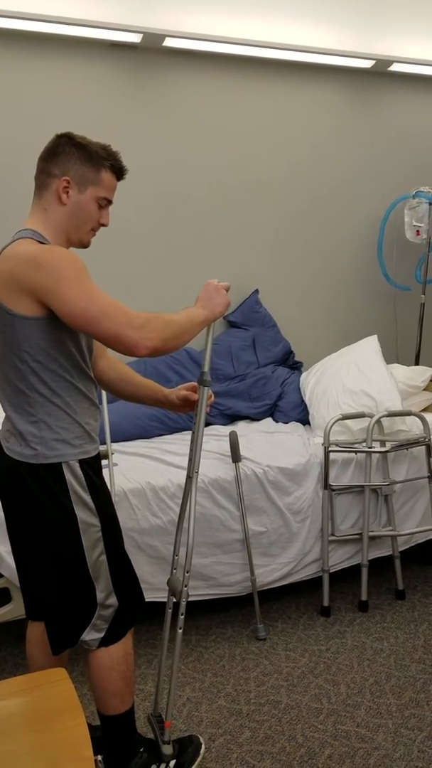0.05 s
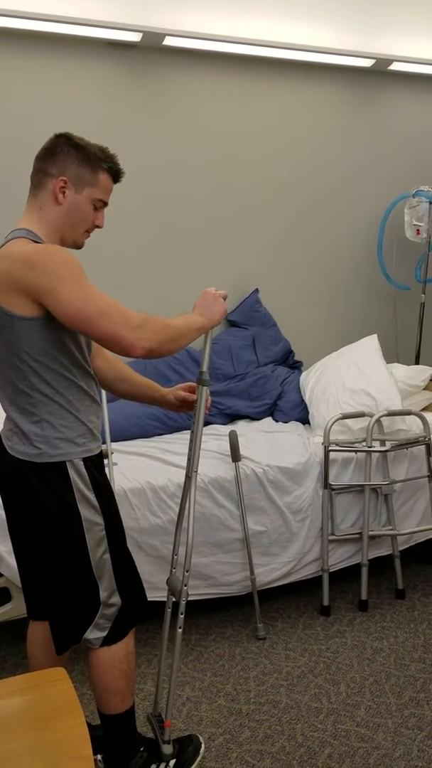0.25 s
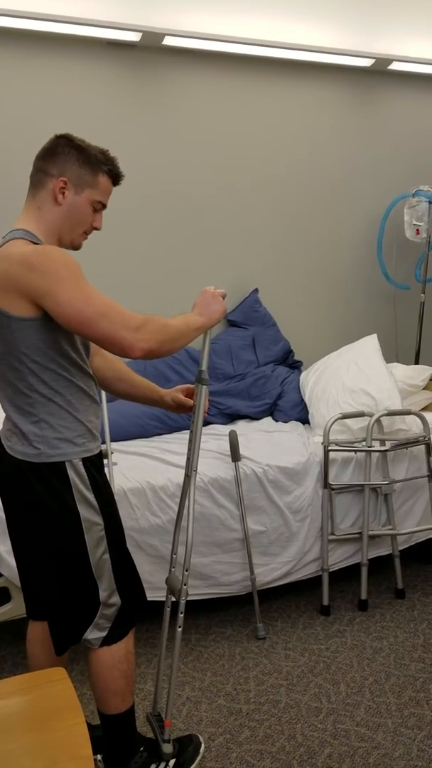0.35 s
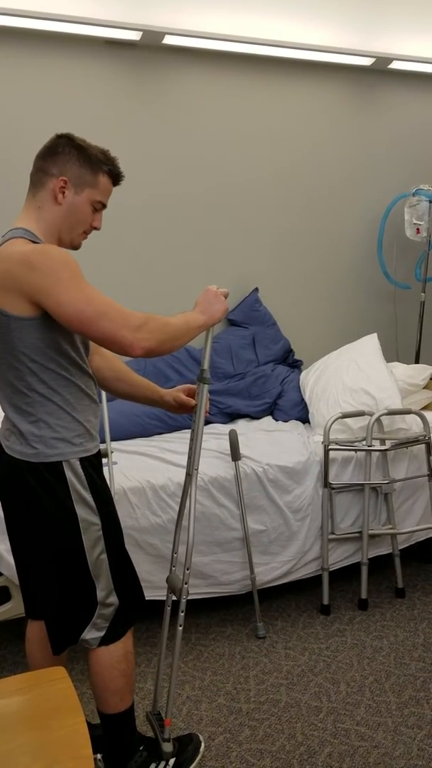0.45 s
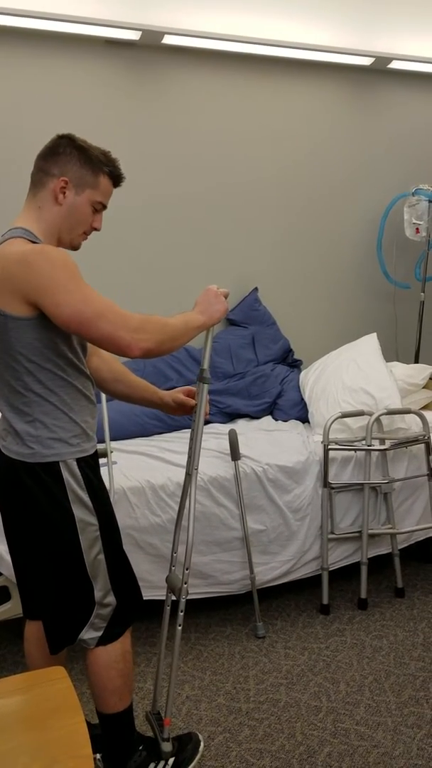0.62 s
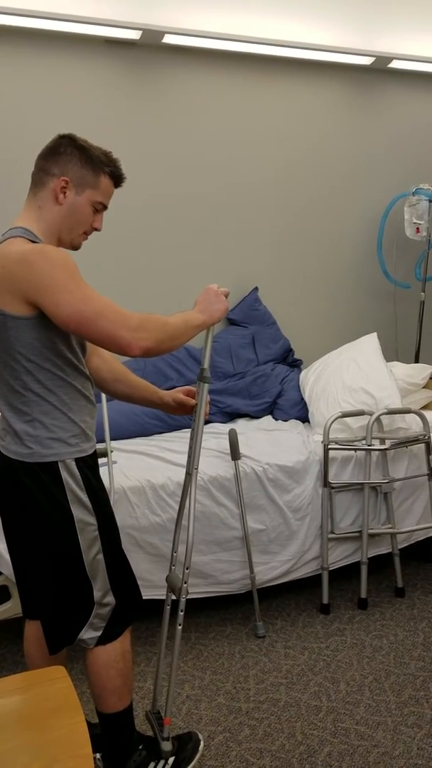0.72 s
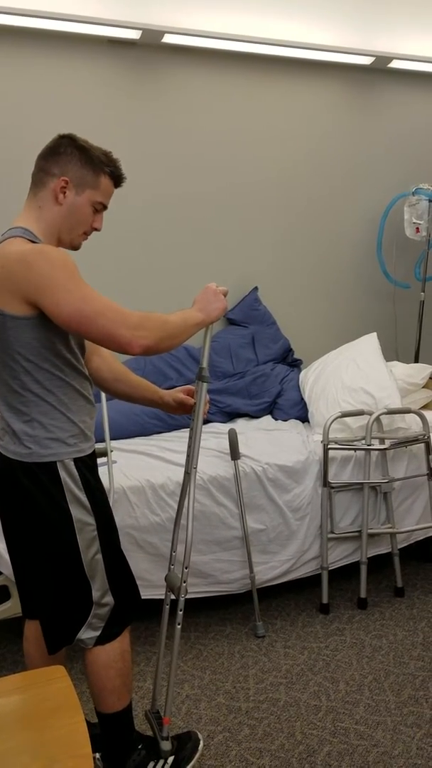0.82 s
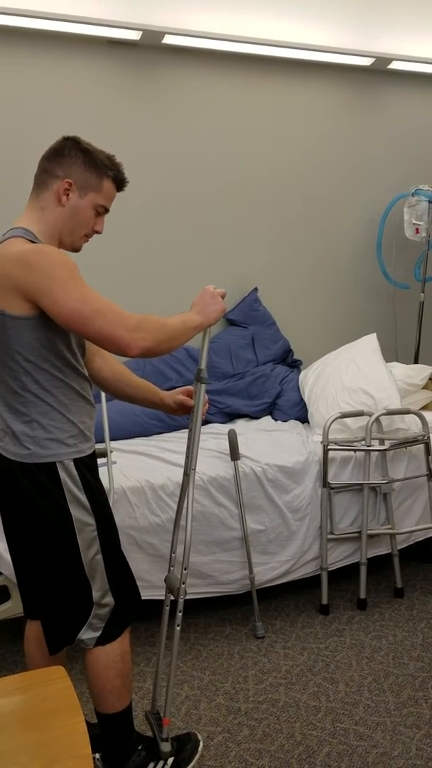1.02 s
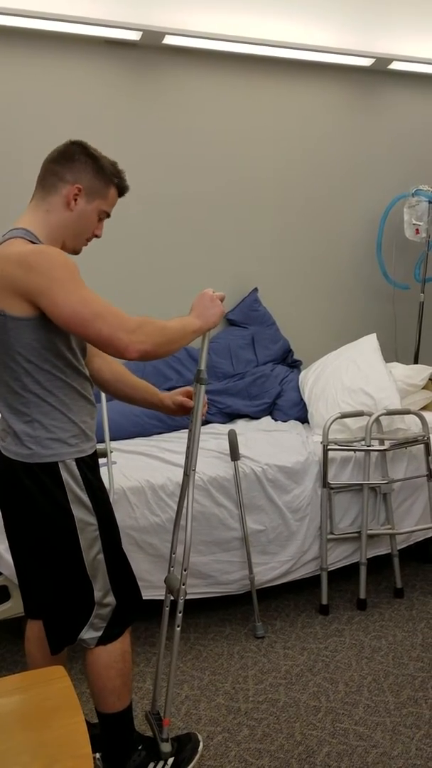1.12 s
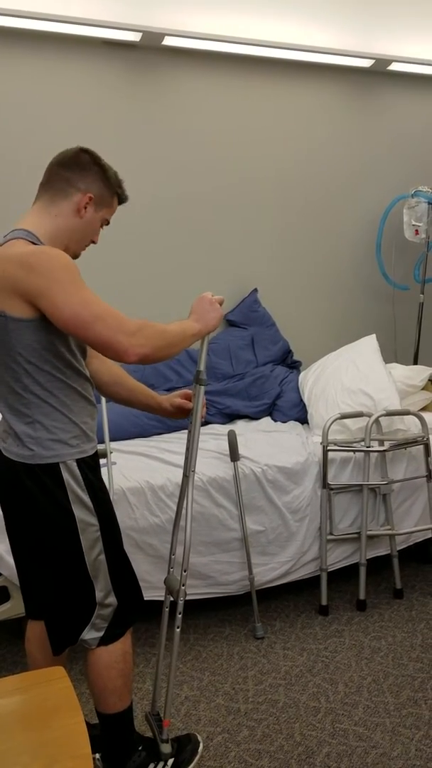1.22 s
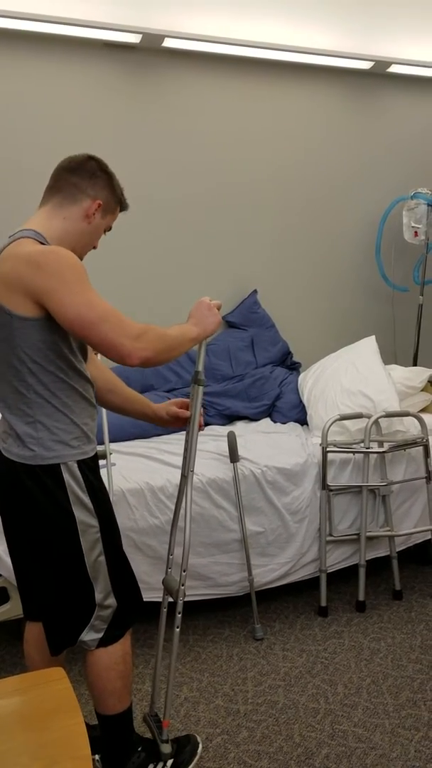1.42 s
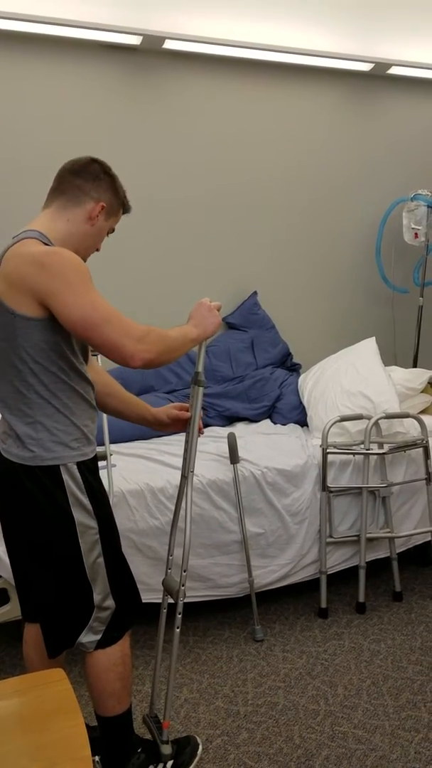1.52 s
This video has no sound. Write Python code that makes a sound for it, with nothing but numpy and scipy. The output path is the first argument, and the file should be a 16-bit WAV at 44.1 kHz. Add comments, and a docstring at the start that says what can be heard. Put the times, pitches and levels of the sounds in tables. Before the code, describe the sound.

An aluminium crutch's spring pin snaps into a hole twice, a second apart, each clack ringing briefly. Between them the pin ticks lightly and the tube slides softly, a few steps away in a small room with faint ventilation hum.

```python
"""The spring pin of an aluminium crutch snaps twice into a hole, a few steps away in a small clinic room.
Each impact radiates a sharp crack and excites the tube's modes, which rattle and ring as they decay.
Between the clacks the pin ticks lightly, one tube slides in the other with soft friction noise,
and the hands add a dull rumble. The walls reflect clacks and ticks over the hum of the ventilation."""
import sys
import numpy as np
from scipy import signal
from scipy.fft import rfft, irfft
from scipy.io import wavfile

SR = 44100
rng = np.random.default_rng(int(sys.argv[2]) if len(sys.argv) > 2 else 0)


def unload_audio(sound):
    """Save the sound as a 16-bit wav file, at the path given as the first command line argument."""
    columns = np.transpose(np.atleast_2d(sound))
    # keep every value between -1 and 1, then stretch to whole-number steps
    steps = np.round(np.clip(columns, -1, 1) * 32767)
    wavfile.write(sys.argv[1], SR, steps.astype(np.int16))


N = 68355

# level difference between the ears for sound from the crutch: f/Hz, left minus right/dB
BALANCE = [(250, -0.5), (700, -0.5), (1300, -7.5), (2400, -3.5), (4400, -0.5), (8000, 1), (15000, -1)]
# coherence of the sound field at the two ears: f/Hz, correlation coefficient
COHERENCE = [(60, .95), (300, 0.93), (780, 0.77), (1300, .15), (2400, -.1), (5000, 0), (15000, 0)]
ROOM_DELAY_S = 0.0074


def amp(db):
    """Amplitude ratio of a level: 20 dB is a factor of ten."""
    return 10 ** (np.asarray(db) / 20)


def unit(x):
    """Normalisation to an rms of 1."""
    return x / np.sqrt(np.mean(x ** 2) + 1e-20)


def read(points, hz):
    """Interpolation of a curve on a logarithmic frequency axis."""
    f, value = np.transpose(points)
    return np.interp(np.log(hz + 1), np.log(f + 1), value)


def pan(db):
    """Left and right gains for an interaural level difference."""
    return amp(np.array([np.atleast_1d(db), -np.atleast_1d(db)]) / 2)


def since(start):
    """Elapsed time in seconds, zero before the onset."""
    return np.maximum(np.arange(N) / SR - start, 0)


def burst(start, hold, fall):
    """Transient envelope: a step, a plateau and exponential relaxation."""
    return (since(start) > 0) * np.exp(-since(start + hold) / fall)


def decay(t, t60):
    """Exponential damping by 60 dB in t60 seconds."""
    return np.exp(-np.log(1000) * t / t60)


def noise(colour, grain_db=0, lean=1):
    """Partially coherent noise, alike at both ears in the bass; lean = 1 gives the crutch's balance."""
    hz = np.fft.rfftfreq(N, 1 / SR)
    left, independent = rfft(rng.standard_normal((2, N)) * amp(grain_db * rng.standard_normal(N)))
    coherence = np.clip(read(COHERENCE, hz), -1, 1)
    right = coherence * left + np.sqrt(1 - coherence ** 2) * independent
    spectrum = np.array([left, right]) * pan(lean * read(BALANCE, hz))
    return unit(irfft(spectrum * amp(read(colour, hz)), N))


def ventilation():
    """Stationary background: a continuous spectrum of rumble and hiss plus the discrete lines of a hum."""
    # air noise: f/Hz, relative spectral density/dB
    air_colour = [(20, -12), (52, -2), (85, -8), (125, -7.5), (165, -15.5), (240, -11.5), (350, -22.5),
                  (460, -18), (600, -27.5), (820, -22), (1000, -30), (1350, -22), (2400, -28.5),
                  (3200, -29.5), (4400, -36.5), (9000, -41.5), (15500, -35.5)]
    # steady tones: f/Hz, level/dB
    hum = [(52, -73), (119, -71), (1363, -80)]
    t = since(0)
    tones = sum(amp(db) * np.sqrt(2) * np.sin(2 * np.pi * (hz * t + rng.random())) for hz, db in hum)
    return pan(-1.7) * (amp(-64) * noise(air_colour, lean=0.27) + tones)


def handling():
    """Structure-borne noise: hands shift the crutch and faintly stir its low resonance."""
    # movements of the hands: t/s, duration/s, level/dB
    shifts = [(0, .17, -57), (0.942, 0.31, -60)]
    # dull rumble: f/Hz, relative level/dB
    rumble_colour = [(20, -5), (60, -4), (118, 5.5), (170, -8), (253, 0), (310, -14.5), (600, -27.5),
                     (4000, -53.5)]
    envelope = sum(amp(db) * burst(start, length, fall=0.017) for start, length, db in shifts)
    return envelope * noise(rumble_colour, lean=0)


def slides():
    """Sliding friction: one tube rubs inside the other, and the noise dies as it comes to rest."""
    # strokes: t/s, rise time/s, T60/s, level/dB, bass shelf gain/dB
    strokes = [(0, .01, 0.7, -64, -11), (.025, 0.03, .42, -60.5, -13.5), (.11, 0.06, .4, -64, -12),
               (.63, .09, 0.23, -74.5, -12), (.956, 0.034, 0.92, -53, -0.5),
               (1.16, .035, 0.86, -61.5, -12.5)]
    # friction noise: f/Hz, relative level/dB
    rub_colour = [(100, 6.5), (450, 5), (800, 1), (1400, -0.5), (2200, -3.5), (4000, -15.5), (8500, -21.5),
                  (12500, -16), (15500, -15.5)]
    shelf_hz = 900
    bass = 1 / (1 + (np.fft.rfftfreq(N, 1 / SR) / shelf_hz) ** 4)
    out = np.zeros((2, N))
    for start, rise, t60, db, bass_db in strokes:
        rub = noise(rub_colour, grain_db=-1.5, lean=0.58)
        rub = unit(irfft(rfft(rub) * amp(bass_db * bass), N))
        envelope = np.minimum(since(start) / rise, 1) * decay(since(start + rise), t60)
        out += amp(db) * envelope * rub
    return out


def reverberation(start, colour, hold):
    """Uneven wall reflections build up, the low ones slowly, hold, then are absorbed band by band."""
    # reverberation time of the room: f/Hz, T60/s
    room_t60 = [(200, 0.43), (700, .23), (1350, 0.29), (2000, .25), (3000, .28), (4500, 0.27), (9000, 0.22),
                (15500, 0.18)]
    onset_s, low_rise_s, low_hz = 0.0025, 0.0066, 702.6
    hz, t, bands = signal.stft(noise(colour, grain_db=3.5), SR, nperseg=256, noverlap=192)
    fade = decay(np.maximum(t - start - hold, 0), read(room_t60, hz)[:, None])
    build = 1 - np.exp(-np.maximum(t - start, 0) / low_rise_s * (1 + (hz[:, None] / low_hz) ** 2))
    tail = signal.istft(bands * build * fade, SR, nperseg=256, noverlap=192)[1][:, :N]
    return tail * (1 - np.exp(-since(start + ROOM_DELAY_S) / onset_s))


def pin_ticks():
    """Weak impacts: the pressed pin gives two bright clicks with echoes; the first rings the tube."""
    # contacts: t/s, click level/dB, echo level/dB
    contacts = [(0.771, -39.5, -48.5), (0.809, -61, -51.5)]
    # click and echo spectrum: f/Hz, relative level/dB
    tick_colour = [(200, -30), (600, -25), (800, 2), (1000, -8.5), (1700, 5.5), (2900, 1), (3800, -6),
                   (4400, 1.5), (7300, -1), (9200, 2.5), (10700, -4.5), (13400, -2), (15300, 3.5)]
    # lightly excited modes: f/Hz, relative level/dB, T60/s
    tick_modes = [(798, -62, 0.19), (1787, -59.5, .18), (2760, -58.5, 0.056)]
    out = np.zeros((2, N))
    for start, click_db, echo_db in contacts:
        click = burst(start, hold=0.0011, fall=0.0015) * noise(tick_colour, lean=0)
        echo = reverberation(start - ROOM_DELAY_S, tick_colour, hold=0.0073)
        out += amp(click_db) * click + amp(echo_db) * echo
    return out + tube_ring(contacts[0][0], tick_modes)


def tube_ring(start, modes):
    """Free vibration in damped normal modes; reflections sustain each briefly and make it flutter."""
    hold_s, flutter_depth, flutter_hz = 0.016, 0.46, 22.8
    t, out = since(start), np.zeros((2, N))
    for hz, db, t60 in modes:
        phase, side = rng.random(2)
        phasors = np.array([1, 1j]) @ rng.standard_normal(size=(2, 128)) / np.sqrt(2)
        reflected = np.interp(t * 2 * flutter_hz, np.arange(len(phasors)), phasors)
        flutter = (1 + flutter_depth * reflected) / np.hypot(1, flutter_depth)
        ear_phase = np.arccos(np.clip(read(COHERENCE, hz), -1, 1)) * np.sign(side - 0.5)
        wave = (flutter * np.exp(2j * np.pi * (hz * t + phase)) * np.exp([[0], [1j * ear_phase]])).real
        swell_s = 0.001 + 0.0055 * (hz / 1000) ** -0.8  # low modes take longer to fill the room
        envelope = (1 - np.exp(-(t / swell_s) ** 1.3)) * decay(since(start + hold_s), t60)
        out += amp(db) * pan(read(BALANCE, hz)) * envelope * wave
    return amp(-4.5) * out


def snap_spectrum(hole):
    """The point of impact excites crowded upper modes unevenly; those struck at a node stay weak."""
    # spectral envelope: f/Hz, relative level at first hole/dB, at second hole/dB
    envelopes = [(157, -21.5, -19), (250, -4.5, -6.5), (346, -15.5, -10), (544, -7, -4), (700, -3, -5),
                 (1005, -4.5, -4.5), (1360, 6, 3.5), (1700, 3.5, 0), (1880, 8, 5.5), (2400, 1.5, -3.5),
                 (3100, -2, 2), (3420, -3, 1.5), (3850, 3, -2.5), (4200, -4, 0.5), (6200, 0, -1),
                 (7100, -1.5, -2), (8000, -3, -3), (8600, -1.5, -1.5), (9600, -4, -0.5),
                 (10500, -2.5, -3.5), (12300, 0, -1), (15500, -3, -2.5)]
    # nodal hollows: f/Hz, width/Hz, gain at first hole/dB, at second hole/dB
    nodes = [(3876, 90, 0.5, -14), (5600, 90, -7, -0.5), (7600, 80, 0.5, -9), (7880, 70, -3, -8),
             (8040, 80, -4, -12), (10550, 130, -8, 2.5)]
    ripple_db, spacing_hz = 3, 60.2
    hz = np.linspace(0, SR / 2, num=round(SR / 2 / spacing_hz))
    smooth = read(np.array(envelopes)[:, [0, hole + 1]], hz)
    ripple = ripple_db * rng.standard_normal(size=2048)[:len(hz)] * (hz > 2500)
    hollows = sum(db[hole] * np.exp(-((hz - centre) / width) ** 2) for centre, width, *db in nodes)
    return np.column_stack([hz, smooth + ripple + hollows])


def tube_rattle(start, colour):
    """Modal overlap: dense, short-lived modes merge into noise; the thin tube radiates little bass."""
    t = since(start)
    radiation = signal.butter(1, 1100, "high", fs=SR)
    return amp(-14) * (t > 0) * decay(t, t60=0.085) * signal.lfilter(*radiation, noise(colour))


def pin_crack(start, delay, length, seat_db, pan_db):
    """Brief contact gives a broad spectrum: the pin touches the rim, then seats in the hole."""
    # contact noise: f/Hz, relative level/dB
    crack_colour = [(200, -31.5), (1000, -18), (1400, -3), (1900, 1.5), (3200, -7), (5000, -5.5),
                    (9000, -5.5), (10300, -7), (11800, 9), (13500, -1.5), (14700, 6.5), (15500, 10.5)]
    touch = amp(-9) * burst(start, delay, fall=0.0005)
    seat = amp(seat_db) * pan(pan_db) * burst(start + delay, length, fall=0.0005)
    return amp(-8) * (touch + seat) * noise(crack_colour)


def clacks():
    """Impact excitation: the pin snaps home, the tube rattles and rings, and the room reverberates."""
    # snaps: t/s, response gain/dB, seating delay/s, seating gain/dB, its duration/s, left minus right/dB
    snaps = [(0.1998, -2.5, .0019, 0.5, 0.002, -7), (1.2122, -2.5, 0.0018, 4, 0.0011, 4)]
    # distinct tube modes: f/Hz, relative level at first hole/dB, at second hole/dB, T60/s
    tube_modes = [(227, -38, -36.5, .35), (253.3, -21.5, -21.5, .29), (791.3, -19.5, -19.5, 0.2),
                  (1320.5, -19.5, -21.5, 0.2), (1342, -21.5, -24, .25), (1408, -29.5, -38, 0.2),
                  (1523, -26, -32.5, .22), (1775, -25.5, -29, 0.21), (1836, -22.5, -25, 0.28),
                  (1874, -25, -32, 0.31), (2114, -31, -29, .23), (2332, -26, -37, .22),
                  (2361, -23.5, -31, 0.2), (2970, -30.5, -22, 0.16), (3250, -35, -23, 0.27),
                  (4060, -34.5, -34.5, 0.21), (5030, -28, -31.5, .2), (5285, -31, -34, 0.23),
                  (5626, -38.5, -30, .19), (7170, -31, -31, 0.24), (7746, -31.5, -40.5, .2),
                  (8930, -33.5, -33, .19), (9360, -31, -31, 0.21), (14080, -28, -28.5, .18)]
    # faint, lightly damped modes of the free end: f/Hz, relative level/dB, T60/s
    end_modes = [(1338, -53, .7), (5437, -75, 1.4)]
    out = np.zeros((2, N))
    for hole, (start, response_db, delay, seat_db, length, pan_db) in enumerate(snaps):
        colour = snap_spectrum(hole)
        crack = pin_crack(start, delay, length, seat_db, pan_db)
        rattle = tube_rattle(start + delay, colour)
        modes = np.array(tube_modes)[:, [0, hole + 1, -1]]
        ring = tube_ring(start, modes) + tube_ring(start, end_modes)
        echo = amp(-15.5) * reverberation(start, colour, hold=0.025)
        out += crack + amp(response_db) * (rattle + ring + echo)
    return out


def scene():
    """Superposition: the sound pressures of the ventilation and the crutch add."""
    return ventilation() + handling() + slides() + pin_ticks() + clacks()


def record(dry):
    """Soft saturation rounds the highest peaks; a low-pass filter then limits the bandwidth."""
    ceiling, cutoff_hz = 0.85, 15950
    rounded = dry / (1 + (dry / ceiling) ** 4) ** (1 / 4)
    lowpass = signal.firwin(511, cutoff_hz, window=("kaiser", 9), fs=SR)
    return signal.oaconvolve(rounded, lowpass[None], "same")


dry = scene()
out = record(dry)
unload_audio(out)
```